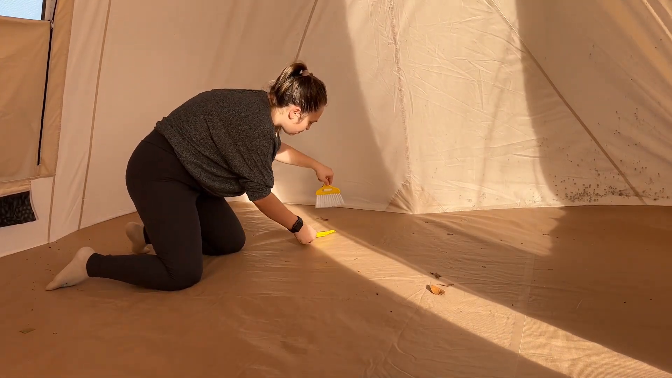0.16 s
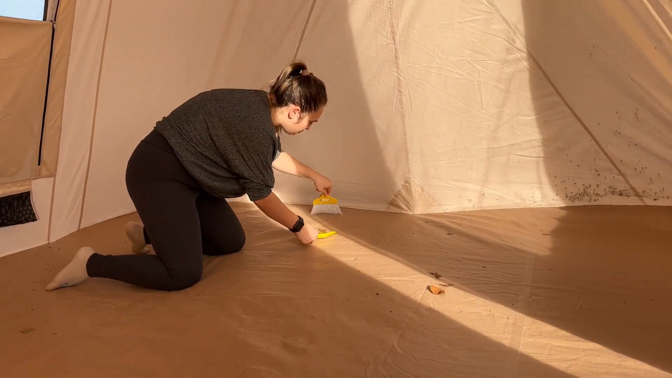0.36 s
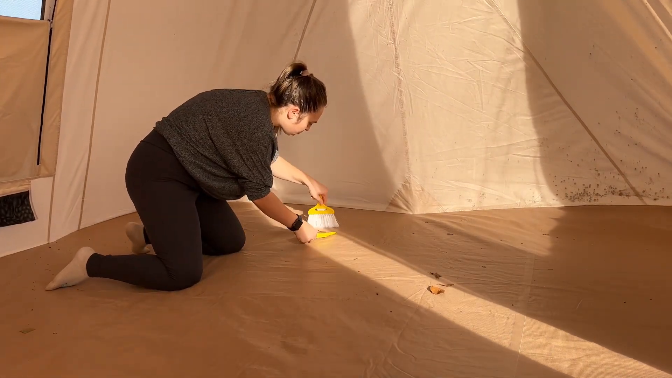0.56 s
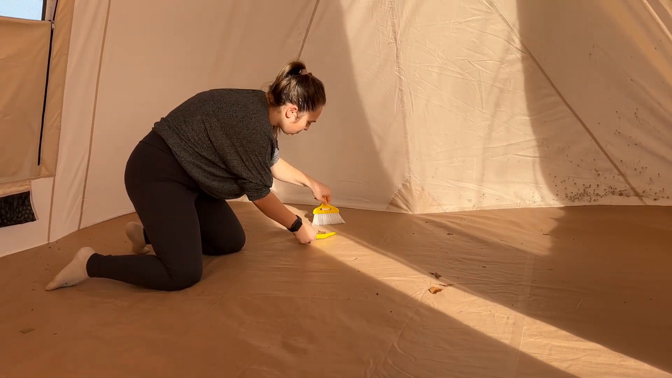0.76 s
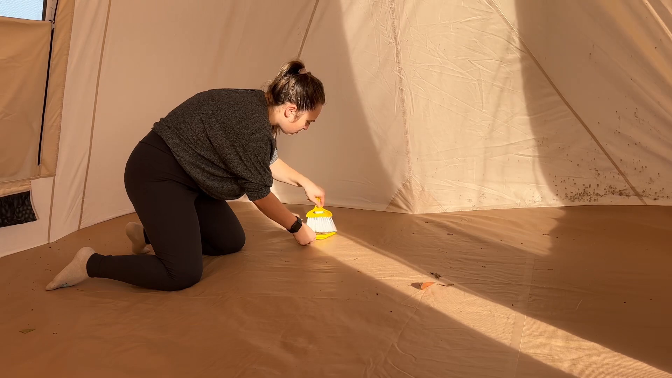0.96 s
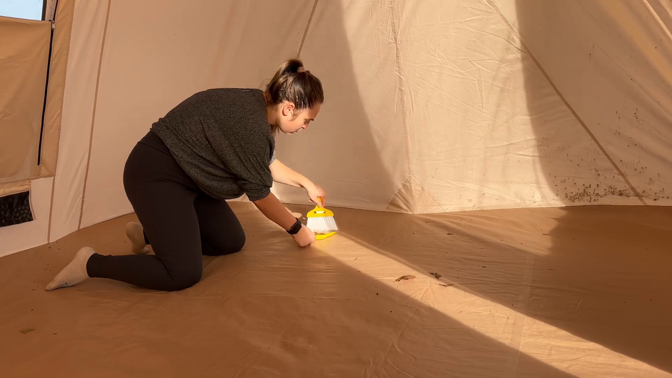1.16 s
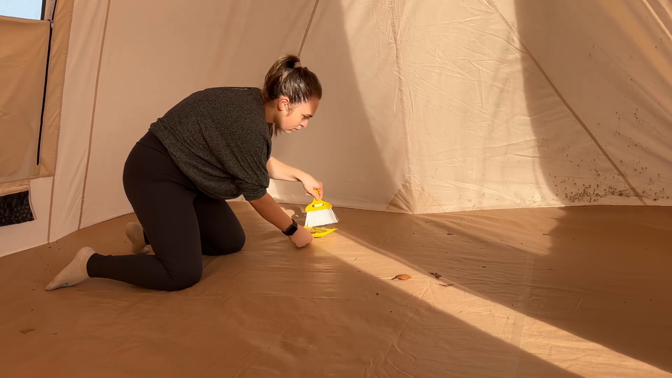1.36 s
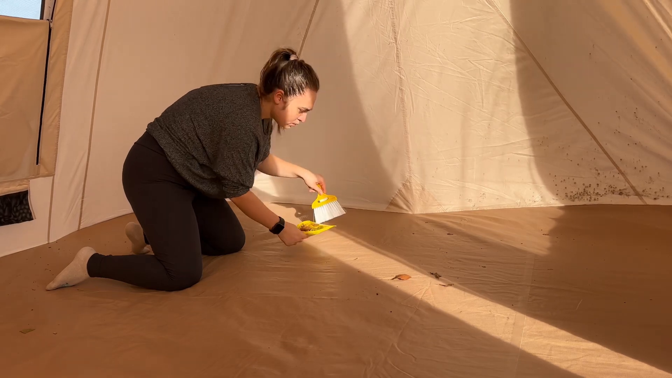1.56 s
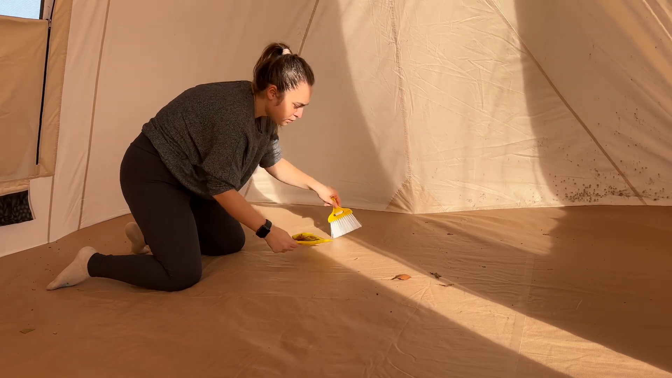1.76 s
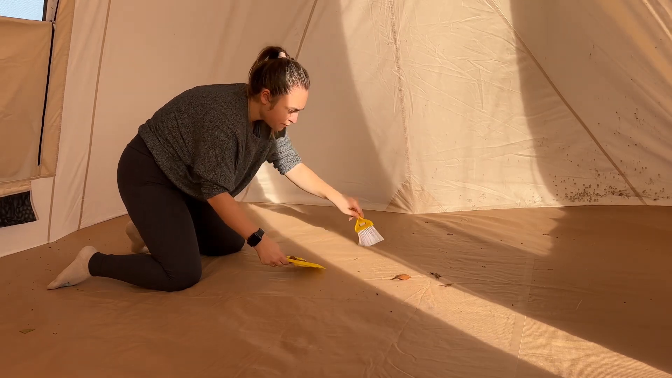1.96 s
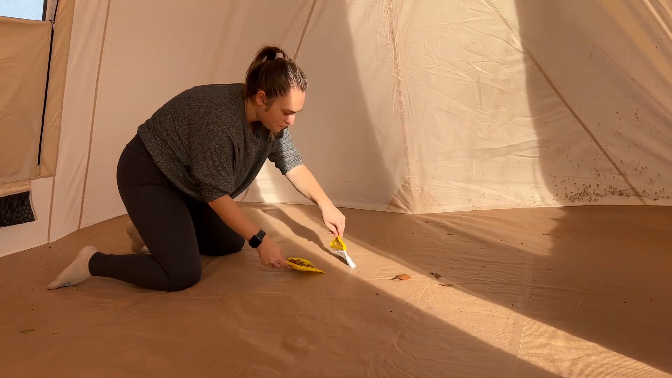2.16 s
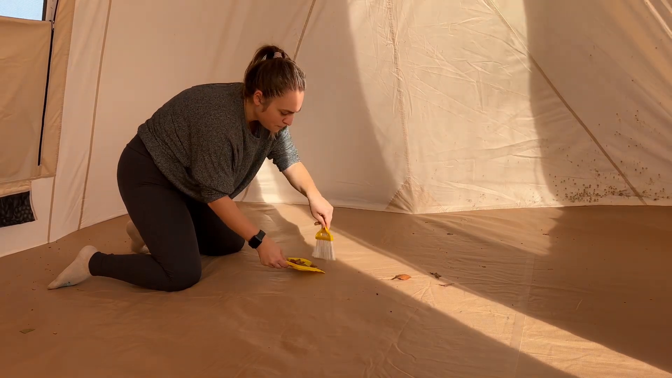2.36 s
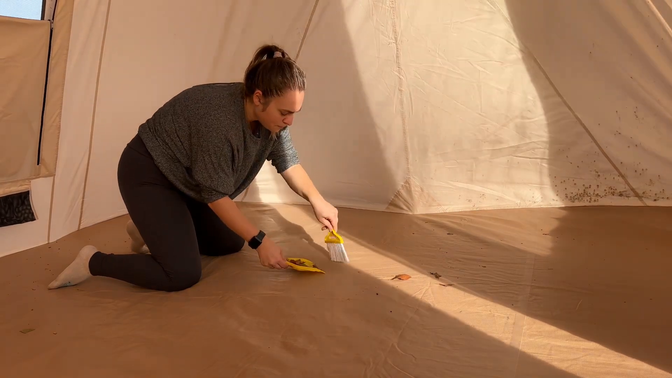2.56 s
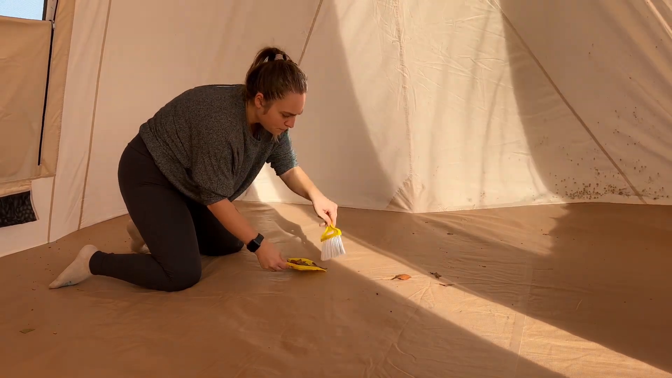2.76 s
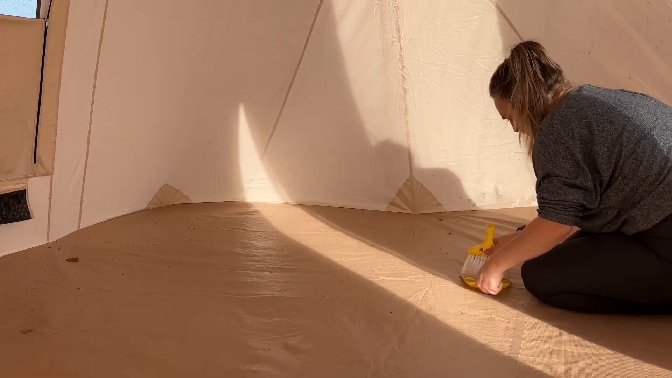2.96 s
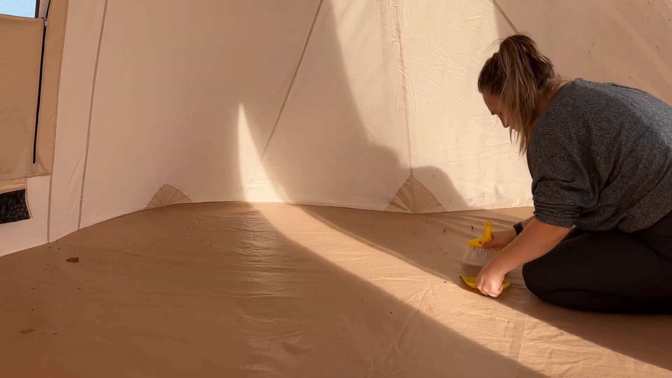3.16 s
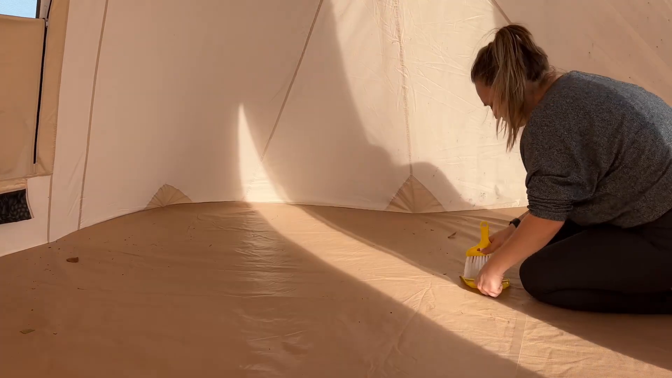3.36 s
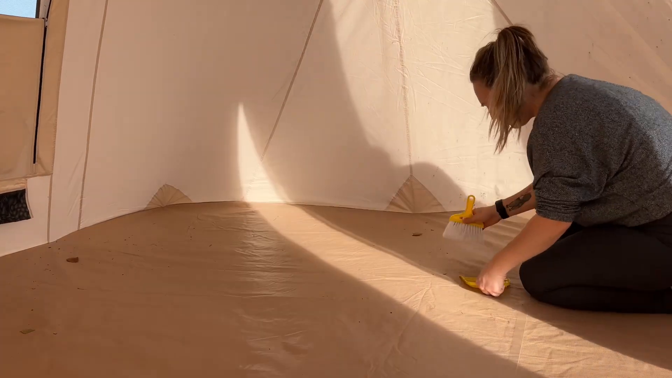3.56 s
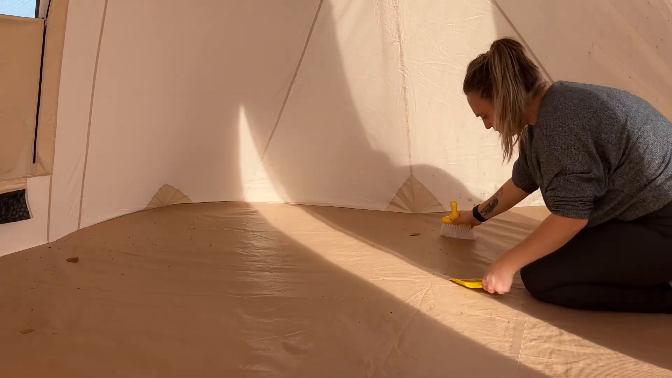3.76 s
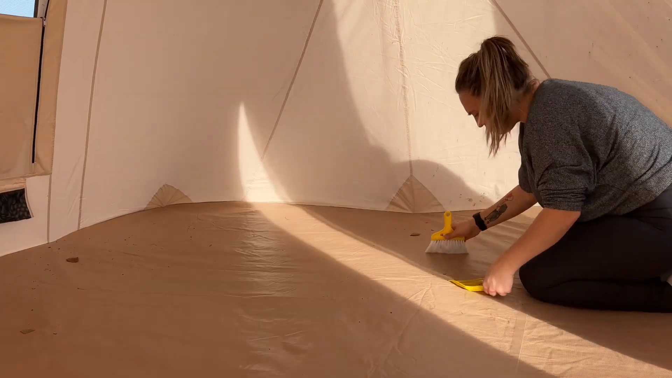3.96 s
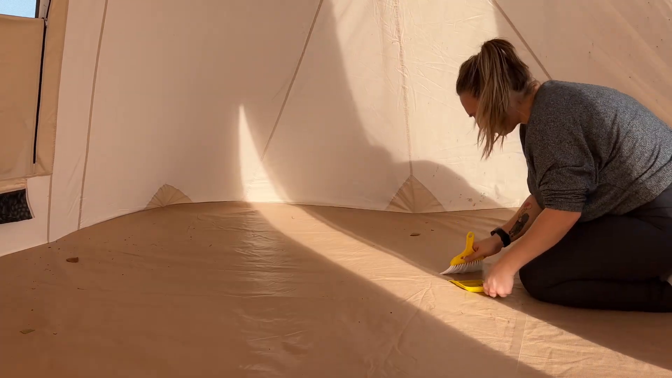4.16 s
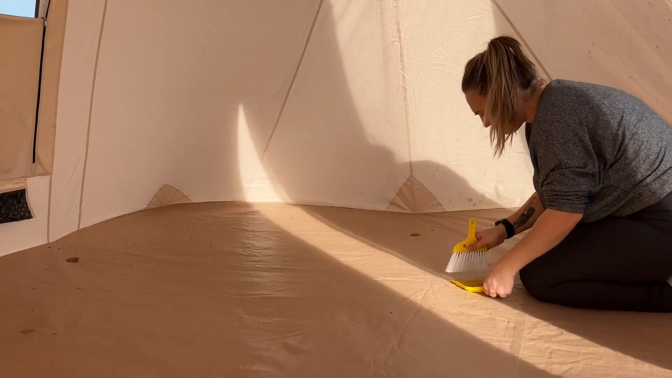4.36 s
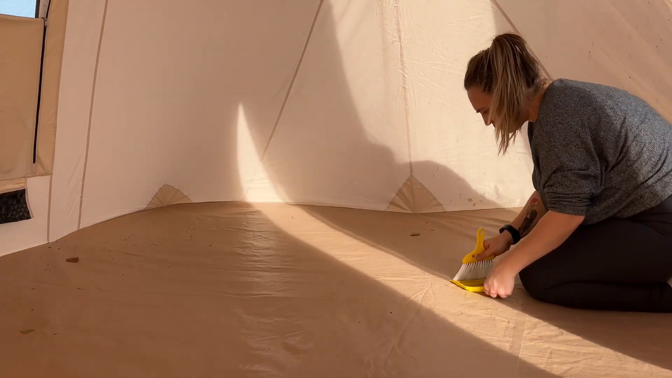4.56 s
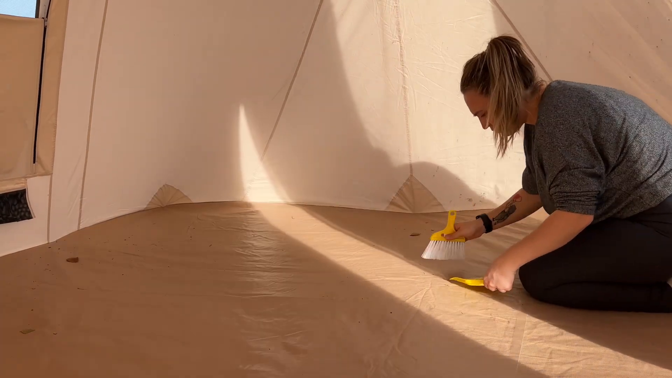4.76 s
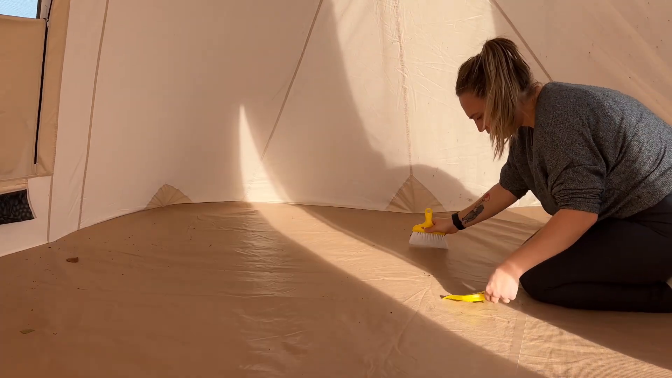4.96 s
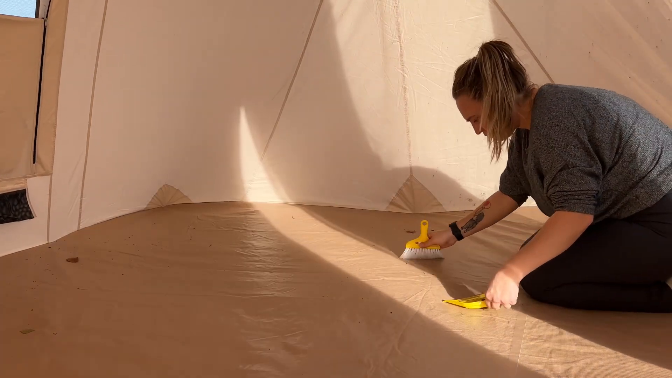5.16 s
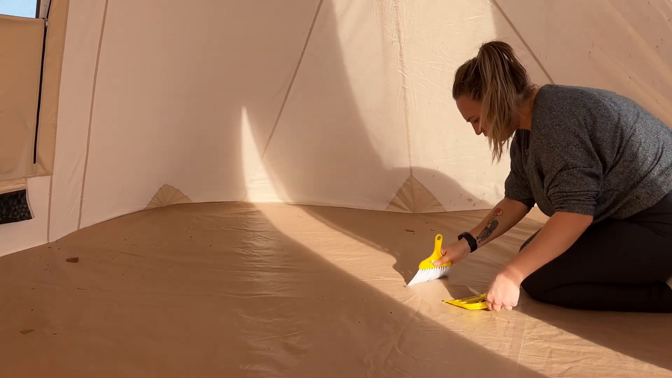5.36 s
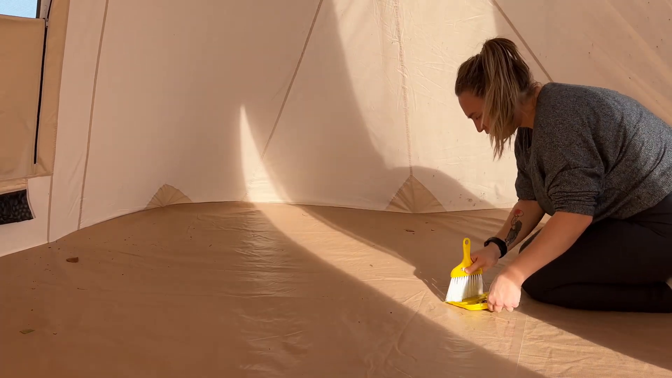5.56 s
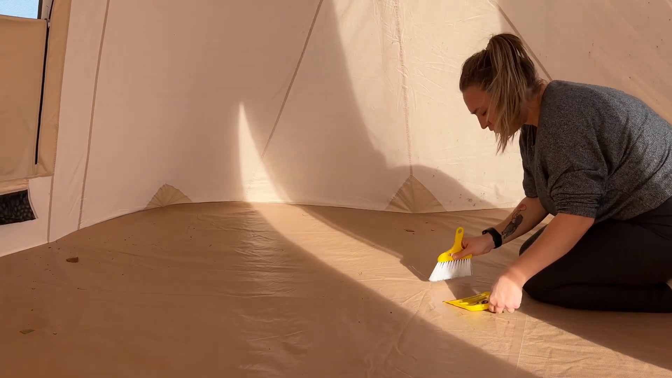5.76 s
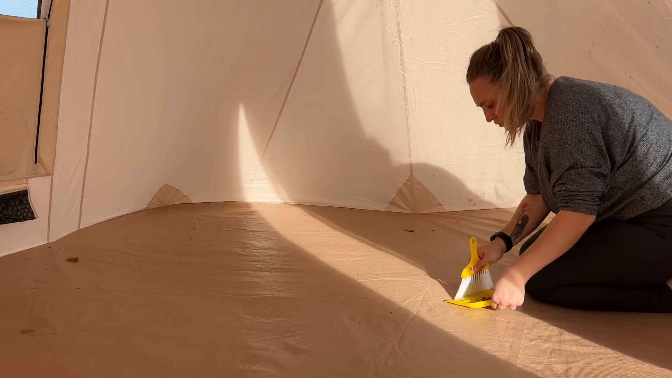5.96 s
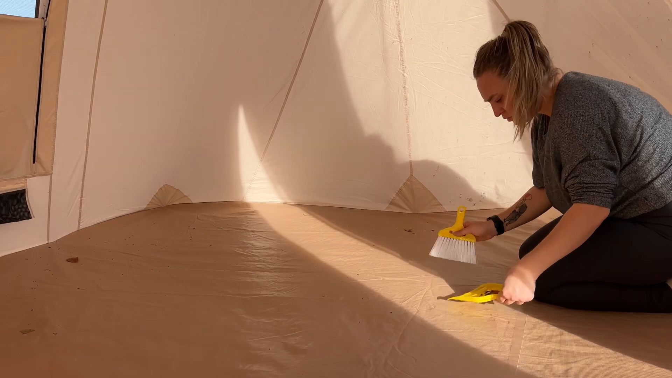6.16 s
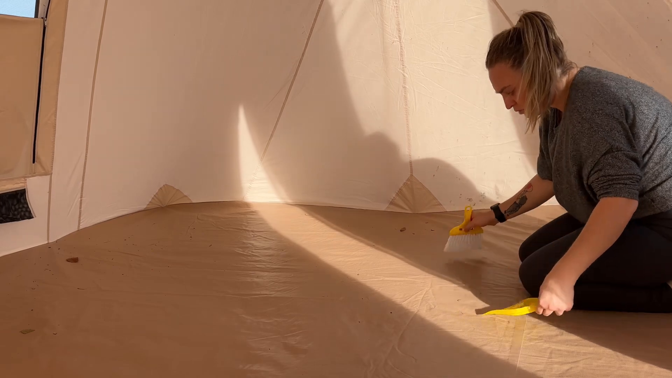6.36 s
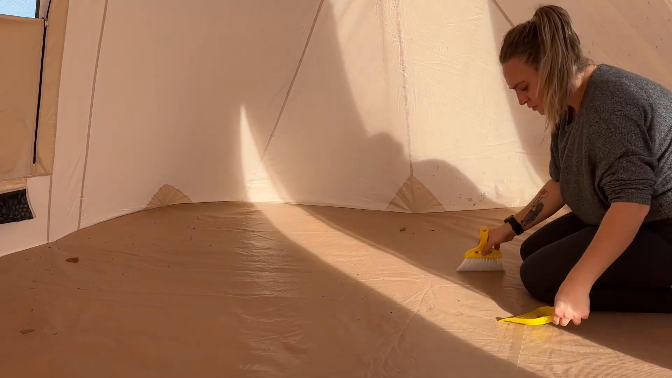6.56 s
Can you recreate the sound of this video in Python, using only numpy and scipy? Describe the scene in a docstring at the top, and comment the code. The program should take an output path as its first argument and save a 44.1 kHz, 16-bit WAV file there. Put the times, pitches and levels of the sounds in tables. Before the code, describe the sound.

A small hand brush sweeps a tent's canvas floor toward a plastic dustpan, over faint low outdoor rumble and sparse grit crackle. A stroke is already ending at 0 s; short hissing strokes follow near 0.3, 0.7 and 1.1 s, with soft pats, tiny pan scrapes and faint wavering squeaks around 0.1-0.4 and 1.3-1.5 s. Quieter strokes start at 1.7 and 2.0 s, then a brisk one at 2.5 s ends in a pan scrape. A knee thuds softly at 2.7 s. From 2.8 s the bristles sound nearer and brighter, with double pats near 3.2 s, a long stroke from 3.65 s, a short one at 4.5 s, plastic ticks at 4.9 s and another long stroke from 5.0 s. The firmest pat lands at 5.8 s, a sharp tick at 6.2 s, and a last stroke at 6.4 s. Clothes rustle more in this half; canvas walls add a short soft tail.

```python
"""Sweeping a tent floor

A hand brush sweeps a tent's canvas floor into a plastic dustpan, first at the back of the tent, then nearer.
Bristle tips make random clicks that blend into hiss, and the sheet drums as filtered noise under them.
Dull pats, ticks and scrapes set off dying tones of the sheet or pan; a knee thuds once and faint squeaks rise.
Grit crackles and clothes rustle over a low outdoor rumble, and the tent walls return a short, soft tail."""
import sys
import numpy as np
from scipy import signal
from scipy.fft import rfft, irfft
from scipy.io import wavfile
from scipy.ndimage import uniform_filter1d

SR = 44100
rng = np.random.default_rng(int(sys.argv[2]) if len(sys.argv) > 2 else 0)


def waveform_to_disk(signal):
    """Save audio, clipped to [-1, 1], as 16-bit WAV at the path in sys.argv[1]."""
    frames = np.transpose(np.atleast_2d(signal))
    scaled = np.clip(frames, -1, 1) * 32767
    samples = np.round(scaled).astype(np.int16)
    wavfile.write(sys.argv[1], SR, samples)


N = 291501
TIME = np.arange(N) / SR  # seconds

# Brush strokes toward the pan. Each row: start in seconds, time to speed up in seconds, time at full speed
# in seconds, hiss on reaching full speed in dB, swell up to it in dB, push toward the end in dB,
# drumming of the sheet in dB, tautness of the sheet from 0 to 1.
STROKES = [ (-.054, 0.08, .033, -31, 2, -1.5, -44, 0), (.289, .138, .134, -30.5, 13.5, 1, -42.5, .1),
           (.68, .17, 0.053, -28.5, 19, 0, -39, 0.36), (1.126, 0.051, 0.018, -30.5, 23, 1.8, -37.5, 0),
           (1.712, .14, 0.18, -35, 19, -3.5, -39.5, 0.54), (1.997, 0.11, 0.14, -34, 17, 7, -41.5, 0.9),
           (2.515, .088, 0.011, -29.5, 25, -0.5, -39.5, .6), (2.783, 0.041, 0.096, -31, 23, 0.5, -37, 0.55),
           (3.164, .13, 0.011, -29, 21, 3.5, -37, 0.6), (3.65, 0.3, .298, -31, 20.5, -1.5, -37, 0.8),
           (4.47, .096, 0.0059, -33, 13, 2.5, -38, 0.7), (4.977, .181, 0.38, -32, 18, 3.5, -39, 1),
           (5.79, 0.14, 0.016, -31.5, 20, 2, -38.5, 0.75), (6.38, 0.19, .06, -31, 21.5, 2, -37, 0.53), ]
# The rasp of whole bristles bending over the sheet. Each row: frequency in Hz, relative level in dB per Hz.
RASP = [(700, -39.5), (1300, 2.5), (1900, 4), (2400, -1.5), (3100, -1.5), (4000, -2.5), (5500, -4.5),
        (9000, -22.5)]
# Tones of the plastic pan. Each row: frequency in Hz, relative level in dB, time to fall by 60 dB in seconds.
PAN_MODES = [(1620, -16, 0.031), (1900, -3, 0.018), (2350, 6, 0.003), (2550, 2.5, 0.0053),
             (3350, -1.5, 0.0056), (4010, 2.5, 0.0042)]


def gain_of(db):
    """Turns decibels into amplitude."""
    return 10 ** (np.asarray(db) / 20)


def evened(x):
    """Scales a sound to an rms (average strength) of 1."""
    return x / np.sqrt(np.mean(x ** 2) + 1e-20)


def read(points, hz):
    """Reads a table between its points, along a log-frequency axis."""
    f, value = np.transpose(points)
    return np.interp(np.log(hz + 1), np.log(f + 1), value)


def add(mix, s, sound):
    """Mixes a sound in from the given second on."""
    part = mix[max(round(s * SR), 0):][:len(sound)]
    part += sound[:len(part)]


def coloured(x, spectrum, size=4096):
    """Filters a sound to the given spectrum, with no echo ahead of the sound (minimum phase)."""
    hz = abs(np.fft.fftfreq(size, 1 / SR))
    log_gain = np.log(gain_of(np.maximum(read(spectrum, hz), -100)))
    response = np.exp(np.conj(signal.hilbert(log_gain)))
    taps = np.fft.ifft(response).real[:size // 2]
    return signal.oaconvolve(x, taps)[:len(x)]


def wander(per_s):
    """A smooth random curve of rms 1 that changes at about the given rate per second."""
    hz = np.fft.rfftfreq(N, 1 / SR)
    slow_spectrum = rfft(rng.standard_normal(N)) / (1 + (hz / per_s) ** 4)
    return evened(irfft(slow_spectrum, N))


def ring(modes, detune=1, size=4096):
    """The dying tones of a struck object, scaled to energy 1."""
    t = np.arange(size) / SR
    wave = sum(gain_of(db - 60 * t / t60) * np.sin(2 * np.pi * hz * detune * t) for hz, db, t60 in modes)
    return wave / np.linalg.norm(wave)


def flicks(per_s, spread_db):
    """Clicks at random moments, many small and a few large, as when bristle tips snap free."""
    size = gain_of(spread_db * np.minimum(rng.exponential(1, N), 4))
    sign = rng.choice([-1, 1], N)
    happens = rng.random(N) < per_s / SR
    return evened(size * sign * happens)


def drifting(x, depth_db, frames_size=17, bins_size=11):
    """Lets the colour drift: random patches in time and pitch grow louder or softer."""
    z = signal.stft(x, nperseg=512)[2]
    patches = uniform_filter1d(rng.standard_normal(z.shape), frames_size, 1)
    patches = evened(uniform_filter1d(patches, bins_size, 0))
    return evened(signal.istft(z * gain_of(depth_db * patches), nperseg=512)[1][:N])


def background():
    """Low outdoor air is filtered noise; clothes rubbing as the body shifts are filtered clicks."""
    # Outdoor rumble. Each row: frequency in Hz, relative level in dB per Hz.
    air_colour = [(12, -24), (20, -3.5), (48, -2.5), (98, -3.5), (133, -2.5), (256, -9.5), (328, -9.5),
                  (567, -12), (725, -17), (855, -16.5), (1160, -18.5), (3560, -33), (14000, -39)]
    # Rustle of the clothes. Each row: frequency in Hz, relative level in dB per Hz.
    cloth_colour = [(120, -24), (220, 0), (320, 4), (430, -2), (600, -9), (1500, -17.5), (5000, -29)]
    # Loudness of the clothes. Each row: time in seconds, level in dB before the trim below.
    shifting = [(0, -51.5), (1.9, -53.5), (2.35, -65), (3.0, -47), (4.1, -43.5), (5.2, -46), (6.6, -43)]
    air = drifting(coloured(rng.standard_normal(N), air_colour), depth_db=1.25, bins_size=3)
    air = air * gain_of(-47 + .5 * wander(per_s=9))
    cloth = drifting(coloured(flicks(per_s=1500, spread_db=3.5), cloth_colour), depth_db=1.5, bins_size=2)
    cloth_db = np.interp(TIME, *np.transpose(shifting)) - 2.5
    return air + cloth * gain_of(cloth_db)


def grit():
    """Crumbs and creases in the sheet crackle faintly throughout: sparse filtered clicks."""
    clicks = flicks(per_s=160, spread_db=2.5)
    colour = [(500, -29), (1500, 2), (2600, -1.0), (5000, -3.5), (11000, -7.0), (14000, -10.5)]
    return gain_of(-61.5) * evened(coloured(clicks, colour))


def held(t, length):
    """Gains of hiss and sheet for one contact: quick touch, hold, then the lift."""
    touch_s = 0.0092  # the bristles meet the sheet
    lift_db, lift_s = 7, 0.032  # most bristles leave the sheet at once
    trail_db_per_s, sheet_damp_db_per_s = 152, 331  # the last ones trail off; the sheet stops sooner
    on = np.clip(t / touch_s, 0, 1)
    off = np.maximum(t - length, 0)  # seconds since the lift
    hiss_db = -lift_db * (1 - np.exp(-off / lift_s)) - trail_db_per_s * off
    return on * gain_of([hiss_db, -sheet_damp_db_per_s * off])


def contact(step_size=32):
    """Levels of hiss and sheet in dB: each stroke eases up to speed, pushes on and lifts; grazes stay even."""
    # Light grazes of the bristles on the sheet, between strokes or as a stroke begins.
    # Each row: start in seconds, length in seconds, hiss in dB, drumming of the sheet in dB.
    grazes = [(.145, 0.17, -52, -59), (0.651, .07, -61, -45), (0.997, 0.12, -52.5, -60),
              (1.247, 0.28, -51.5, -54.5), (1.592, 0.084, -57.5, -53.5), (1.734, 0.056, -60, -42.5),
              (3.498, 0.16, -52, -50), (3.668, 0.071, -52, -48), (4.651, 0.053, -58, -47.5),
              (4.904, 0.067, -47, -40.5), (6.192, .054, -45, -55)]
    sheet_swell_db = 10.5  # the sheet drums from the first touch, so it mostly swells less than the hiss
    sheet_push = .65  # share of the final push that reaches the sheet
    clock, power = TIME[::step_size], 1e-12
    for s, rise, hold, hiss_db, swell_db, push_db, sheet_db, _ in STROKES:
        t = clock - s
        slow = .5 + .5 * np.cos(np.pi * np.clip(t / rise, 0, 1))  # 1 at the start, 0 at full speed
        push = push_db * np.clip((t - rise) / hold, 0, 1)
        hiss_level = hiss_db - swell_db * slow + push
        sheet_level = sheet_db - sheet_swell_db * slow + sheet_push * push
        power = power + (gain_of([hiss_level, sheet_level]) * held(t, rise + hold)) ** 2
    for s, length, hiss_db, sheet_db in grazes:
        power = power + (gain_of([[hiss_db], [sheet_db]]) * held(clock - s, length)) ** 2
    return [np.interp(TIME, clock, 10 * np.log10(p)) for p in power]


def brush():
    """Flicking tips hiss, bending bristles rasp and the sheet drums, all gripping and slipping together."""
    # Hiss at the back of the tent, then nearer. Each row: frequency in Hz, relative level in dB per Hz.
    hiss_far = [(1500, -18.5), (2800, -11), (4200, -12), (5500, -3.5), (7200, -0.5), (9500, -0.5),
                (11500, 1), (13500, 3.5), (14300, -10.5)]
    hiss_near = [(1500, -27.5), (3000, -6), (4300, -6.5), (6400, -2.5), (9500, 0.5), (12000, 2.5),
                 (13500, 6), (14300, -11.5)]
    # The sheet where it lies slack, then where it is pulled taut.
    # Each row: frequency in Hz, relative level in dB per Hz.
    sheet_slack = [(200, -36), (340, -20.5), (440, 0.5), (530, -1), (615, 1.5), (740, -5), (950, -10.5),
                   (1250, -8.5), (1600, -10), (2600, -43.5), (5000, -41)]
    sheet_taut = [(200, -33.5), (350, -14), (450, -6.5), (620, 0.5), (720, -1.5), (850, -3), (1050, -5),
                  (1300, -15), (1600, -18), (2600, -31.5), (5000, -45)]
    near_from_s = 2.79
    hiss_db, sheet_db = contact()
    grip = wander(per_s=22)

    tips = flicks(per_s=22000, spread_db=2.5)
    near = np.clip((TIME - near_from_s) / .01, 0, 1)
    hiss = (1 - near) * evened(coloured(tips, hiss_far)) + near * evened(coloured(tips, hiss_near))
    hiss = drifting(hiss, depth_db=0.8) * gain_of(hiss_db + 1.1 * grip)

    tufts = flicks(per_s=3500, spread_db=1.8)
    rasp_db = .65 * hiss_db + .35 * sheet_db  # the rasp grows with both the speed and the weight of the stroke
    rasp = drifting(coloured(tufts, RASP), depth_db=1.2, bins_size=7)
    rasp = rasp * gain_of(rasp_db + 0.85 * grip - 8 + 0.84 * near)

    starts, *_, tautness = np.transpose(STROKES)
    # each stroke crosses its own patch of the sheet
    taut = np.clip(tautness, 0, 1)[np.searchsorted(starts, TIME) - 1]
    slack_part = (1 - taut) * evened(coloured(tufts, sheet_slack))
    taut_part = taut * evened(coloured(tufts, sheet_taut))
    sheet = drifting(slack_part + taut_part, depth_db=2.0, bins_size=2) * gain_of(sheet_db + 1.1 * grip)
    return hiss + rasp + sheet


def scrapes():
    """The pan scrapes, under the bristles or along the floor: a rattle of noise keeps its tones ringing."""
    # Each row: start in seconds, length in seconds, level in dB.
    scrape_rows = [(0.017, 0.05, -43.5), (0.988, 0.045, -51.5), (1.183, 0.04, -42), (1.276, 0.017, -47.5),
                   (2.608, 0.028, -36), (4.669, 0.066, -50.5), (4.911, 0.084, -45), (5.922, 0.031, -37),
                   (6.023, 0.04, -47), (6.204, 0.074, -56)]
    out = np.zeros(N)
    for s, length, db in scrape_rows:
        count = round(length * SR)
        rattle = rng.standard_normal(count) * signal.windows.tukey(count, .4)
        add(out, s, gain_of(db) * signal.fftconvolve(rattle, ring(PAN_MODES)))
    return out


def squeaks():
    """Faint, slightly rising squeaks: sine tones with an unsteady pitch."""
    # Each row: start in seconds, length in seconds, first pitch in Hz, last pitch in Hz (both before the
    # wavering), level in dB before the boost below.
    squeak_rows = [(0.121, 0.058, 1120, 1185, -50), (0.223, 0.15, 1080, 1222, -47.5),
                   (1.309, 0.067, 1088, 1103, -48.5), (1.455, 0.084, 893, 905, -52)]
    out = np.zeros(N)
    for s, length, first_hz, last_hz, db in squeak_rows:
        count = round(length * SR)
        hz = np.linspace(first_hz, last_hz, count) * (1 + 0.07 * wander(per_s=180)[:count])
        tone = np.sin(2 * np.pi * np.cumsum(hz) / SR)
        add(out, s, gain_of(db + 5.0) * tone * np.hanning(count))
    return out


def ticks():
    """Plastic and grit tick: a short bright snap of noise that also knocks the hollow pan."""
    # Each row: time in seconds, level in dB before the boosts below,
    # pan's hollow knock relative to the snap in dB before its extra 1 dB.
    tick_rows = [(0.1965, -35, -21), (0.2225, -32, -26), (2.786, -30.5, -32), (3.1156, -40, -17),
                 (3.175, -32, -5), (3.435, -33, -21), (3.52, -32.5, -25), (3.6541, -32.5, 1.5),
                 (4.8613, -36, -3), (4.9057, -32.5, 0), (4.9174, -24, -9.5), (6.2079, -17.5, -15)]
    # Colour of the snap. Each row: frequency in Hz, relative level in dB per Hz.
    snap_colour = [(1500, -21), (2300, -25), (3600, -28), (4700, -9), (5200, -4.5), (6300, -1),
                   (7500, -7.5), (10300, -1), (12000, -1), (14000, -3)]
    out, t = np.zeros(N), np.arange(4096) / SR
    for s, db, knock_db in tick_rows:
        crack = rng.standard_normal(len(t)) * t * np.exp(-t / 0.0022)  # strongest after 2.2 ms
        snap = coloured(crack, snap_colour)
        knock = signal.fftconvolve(crack, ring(PAN_MODES, rng.uniform(1.0, 1.13)))
        start = s - .0015  # early, as the crack needs a moment to build
        add(out, start, gain_of(db + 15.5) * snap / np.linalg.norm(snap))
        add(out, start, gain_of(db + knock_db + 16.5) * knock / np.linalg.norm(knock))
    return out


def pats():
    """The brush lands: first tufts, one blow on the sheet, and other tufts in a dying patter and rasp."""
    # Each row: time of the main blow in seconds, peak of the pat in dB, patter of the other tufts in dB
    # before it dies away, time they take to settle in seconds, first rasp of the splaying bristles in dB.
    pat_rows = [(.294, -25.5, -19, .012, -48), (.714, -28.5, -20, .011, -48), (1.133, -33, -11, 0.014, -50),
                (2.816, -28, -12, 0.011, -57), (3.161, -20.5, -12, 0.011, -50),
                (3.176, -22.5, -9, 0.011, -48), (3.708, -27.5, -6, .01, -45),
                (3.767, -26.5, -26, 0.0059, -44.5), (4.479, -22.5, -5, .011, -43.5),
                (4.906, -24.5, -14, .011, -43), (4.946, -27.5, -10, 0.033, -47),
                (5.798, -15.5, -12, 0.0099, -47), (6.384, -28.5, -12, 0.048, -42),
                (6.419, -25.5, -19, 0.0079, -42.5)]
    # What the sheet rings with when struck, before a random retuning.
    # Each row: frequency in Hz, relative level in dB, time to fall by 60 dB in seconds.
    sheet_modes = [(340, -66, 0.018), (483, -37, 0.018), (570, 5, 0.044), (723, 22, 0.018),
                   (810, -2, 0.022), (1083, 13.5, 0.013), (1520, -12, .008), (2960, 8, 0.0092)]
    lead_s, lead_db = 0.004023, -11.5  # the first tufts meet the sheet just before the main blow
    splay_s = 0.033  # decay of the rasp
    # springy bristles cushion the blow
    cushion = [(100, -10), (350, 4.5), (1200, 2.0), (3200, -1.5), (7000, -12)]
    out, t = np.zeros(N), np.arange(8000) / SR
    for s, db, patter_db, settle, splay_db in pat_rows:
        patter = gain_of(patter_db) * rng.standard_normal(len(t))
        blow = patter * np.exp(-t / settle) * np.minimum(t / lead_s, 1)
        blow[0] += 2 * gain_of(lead_db)
        blow[round(lead_s * SR)] += 2
        pat = signal.fftconvolve(blow, ring(sheet_modes, rng.uniform(0.86, 1.04)))
        pat = coloured(pat, cushion)
        add(out, s - lead_s, gain_of(db) * pat / abs(pat).max())
        splay = evened(coloured(rng.standard_normal(len(t)), RASP)) * np.exp(-t / splay_s)
        add(out, s, gain_of(splay_db) * splay)
    return out


def knee(s=2.735, length=0.048, db=-34, hz=100):
    """A knee gives the ground a soft, low push: a short low tone with some rubbing noise."""
    out, count = np.zeros(N), round(length * SR)
    t = np.arange(count) / SR
    rub_colour = [(40, -8), (130, -12), (220, 5), (350, -23), (1200, -52)]
    rub = evened(coloured(rng.standard_normal(count), rub_colour))
    push = np.sin(2 * np.pi * hz * t) + 0.42 * rub
    add(out, s, gain_of(db) * push * signal.windows.tukey(count, .6))
    return out


def tent(x):
    """Canvas walls return a short, soft tail: sparse echoes, each band dying at its own speed."""
    # Each row: frequency in Hz, time to fall by 60 dB in seconds.
    tent_decay = [(200, 0.28), (700, 0.066), (2500, 0.56), (7000, 0.42), (14000, 0.14)]
    count = SR // 2
    sign = rng.choice([-1., 1.], count)
    happens = rng.random(count) < 3000 / SR  # about 3000 echoes per second
    taps = sign * happens * (TIME[:count] > .005)
    hz, t, z = signal.stft(taps, SR, nperseg=256)
    decay = gain_of(-60 * t / read(tent_decay, hz)[:, None])
    tail = signal.istft(z * decay, SR, nperseg=256)[1]
    return signal.fftconvolve(x, tail / np.linalg.norm(tail))[:N]


def scene():
    """Everything reaches one microphone, the same in both channels."""
    sweeping = brush() + scrapes()
    landing = pats() + knee()
    ticking = ticks() + grit()
    room = tent(gain_of(-14.5) * sweeping + gain_of(-8.0) * landing + gain_of(-8.5) * ticking)
    mono = sweeping + landing + ticking + room + squeaks() + background()
    return np.array([mono, mono])


def record(dry):
    """The recorder's band limit: a steep filter removes the highest treble."""
    edge_hz = 14300
    low_pass = signal.firwin(511, edge_hz, window=("kaiser", 9), fs=SR)
    return signal.oaconvolve(dry, low_pass[None], "same")


dry = scene()
out = record(dry)
waveform_to_disk(out)
```